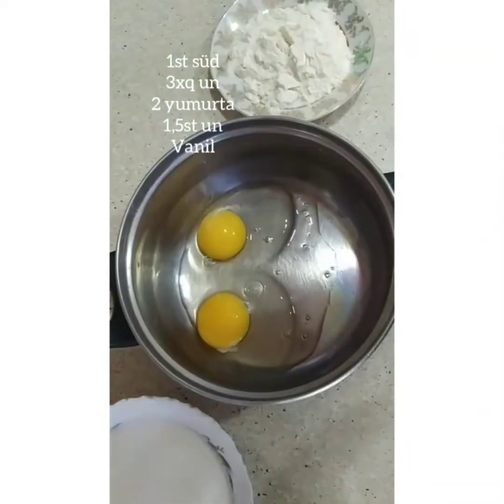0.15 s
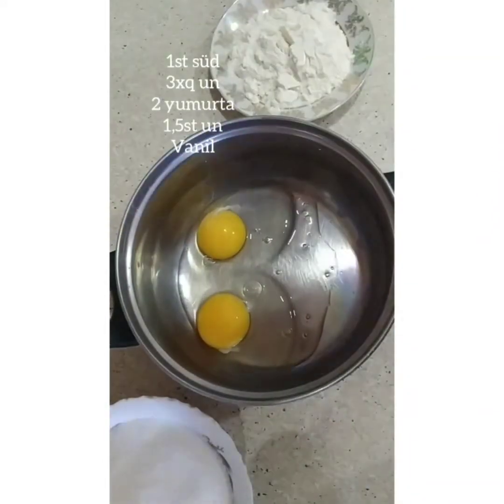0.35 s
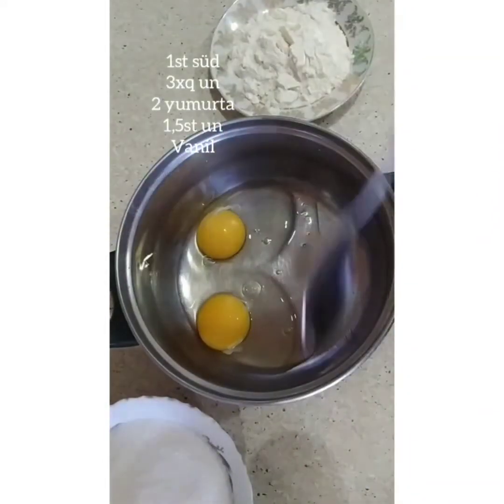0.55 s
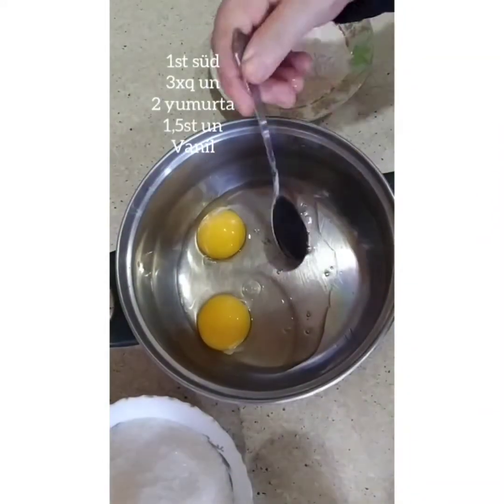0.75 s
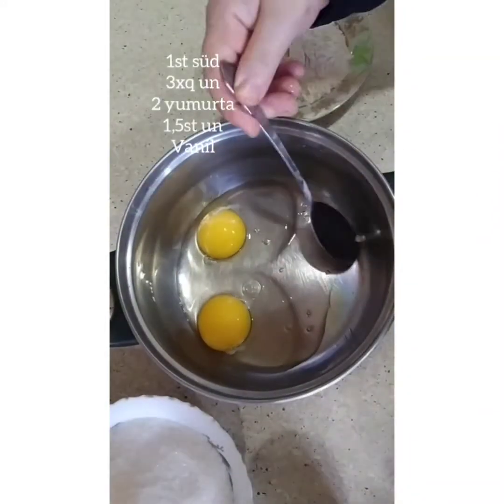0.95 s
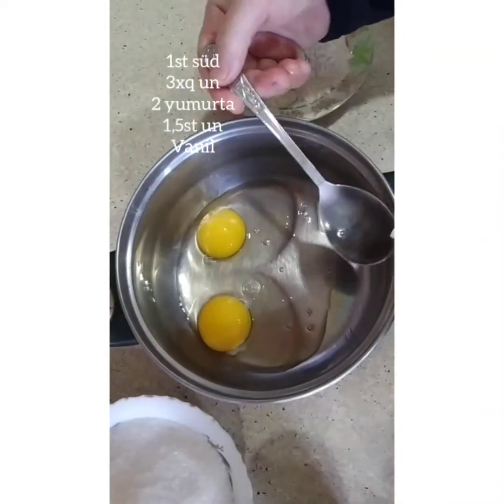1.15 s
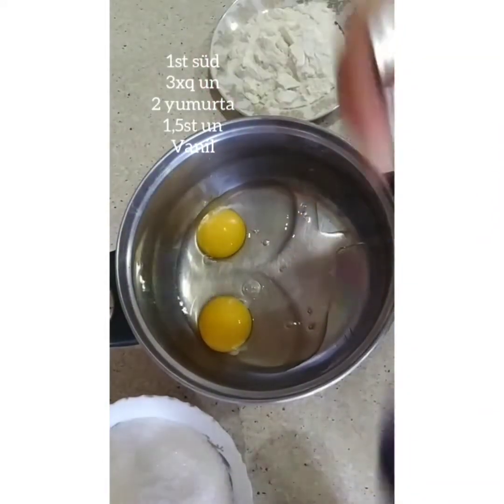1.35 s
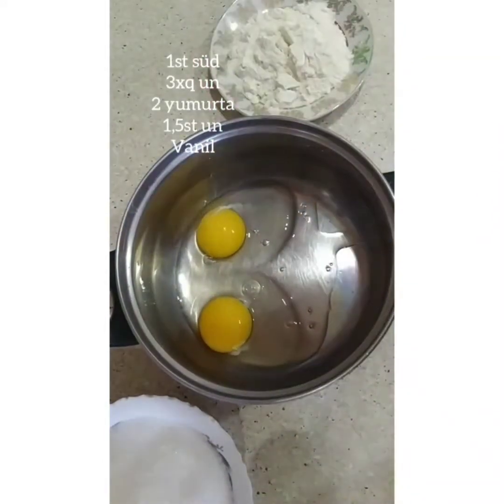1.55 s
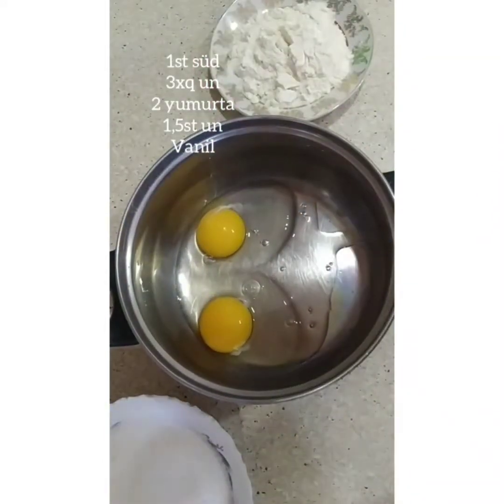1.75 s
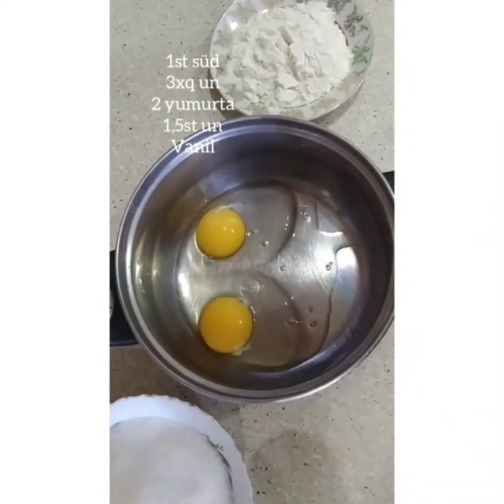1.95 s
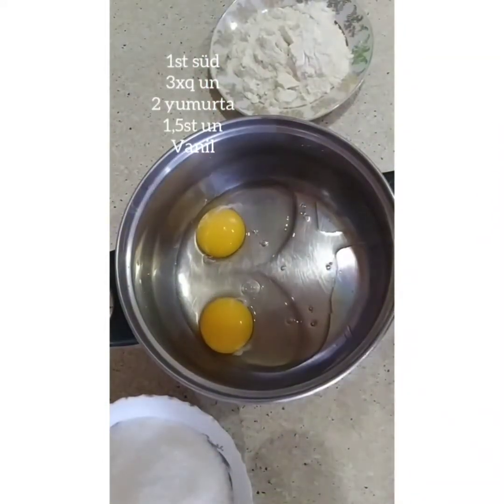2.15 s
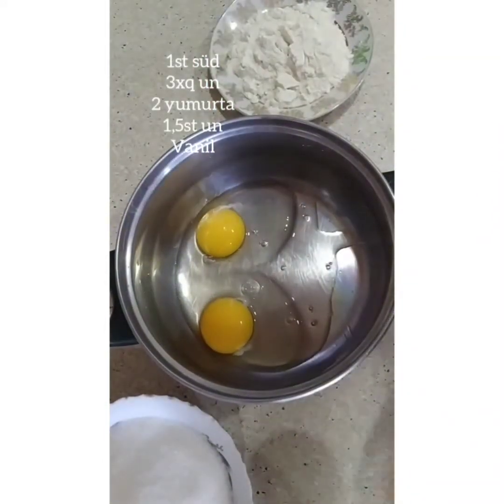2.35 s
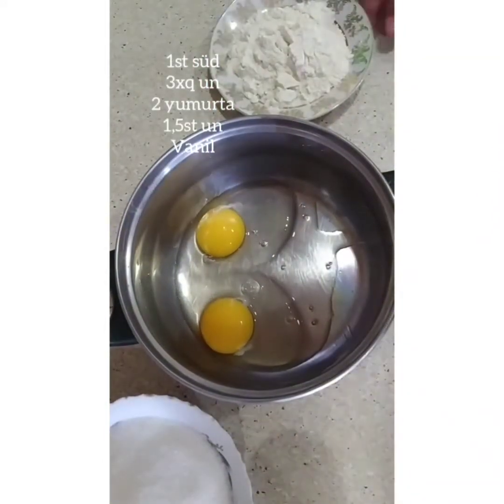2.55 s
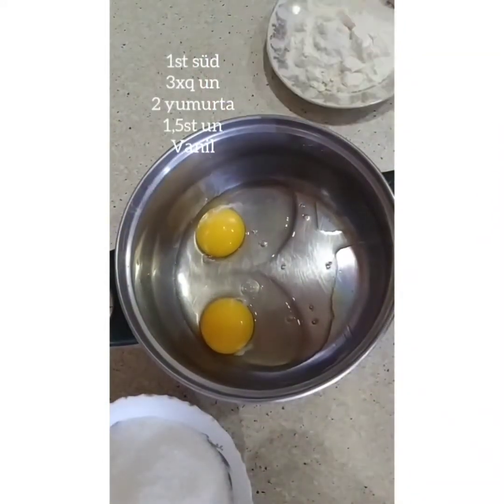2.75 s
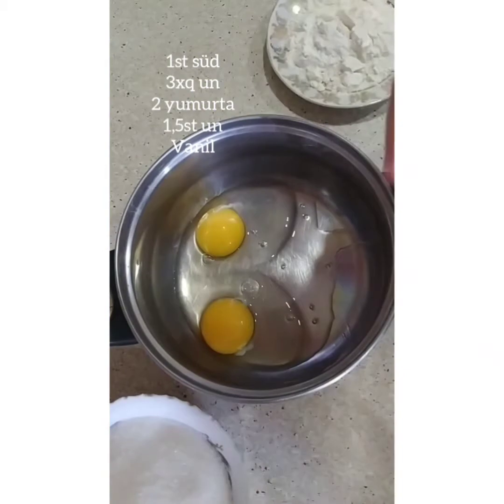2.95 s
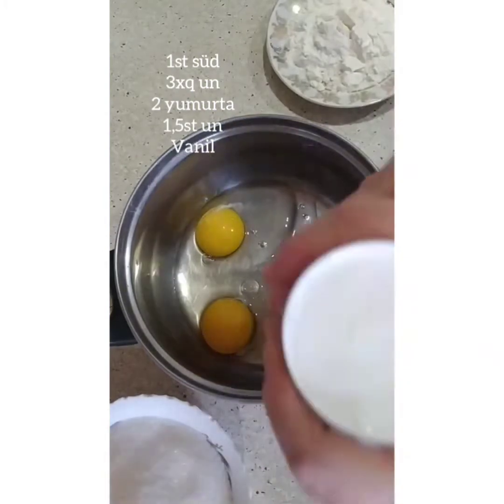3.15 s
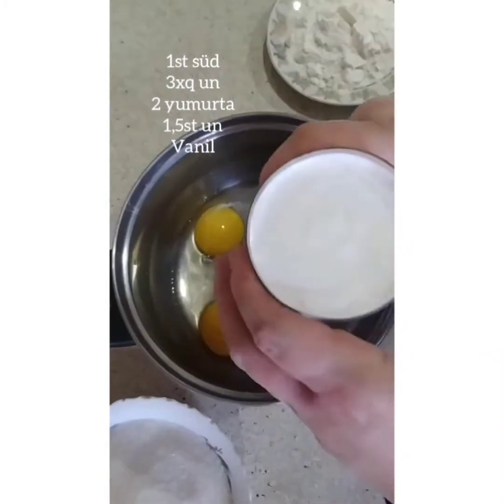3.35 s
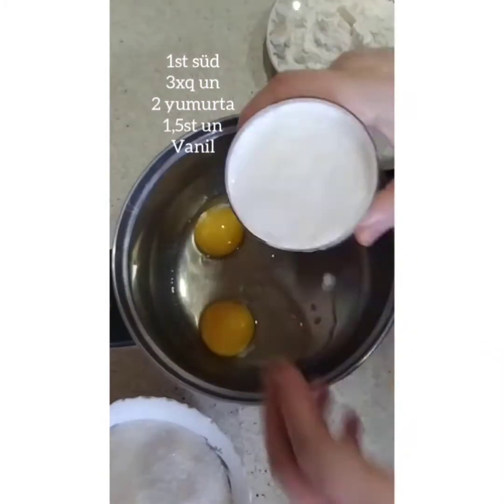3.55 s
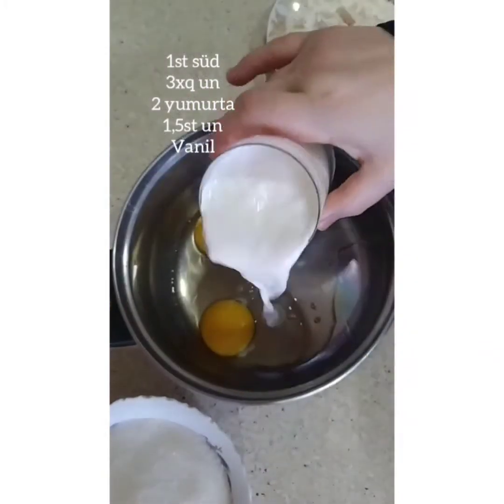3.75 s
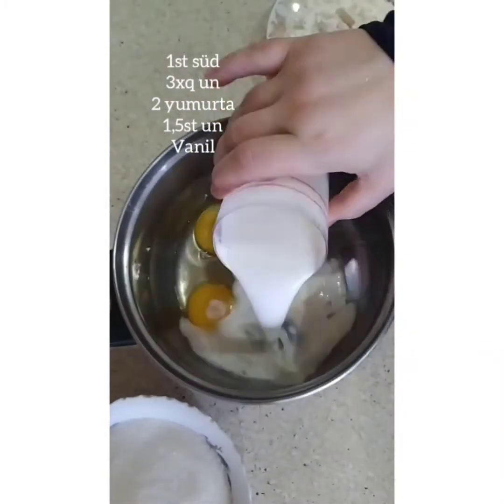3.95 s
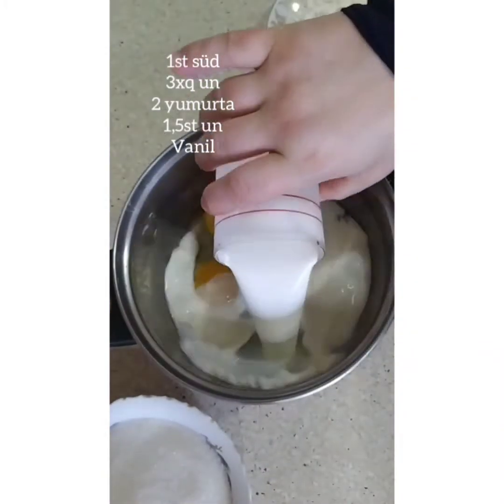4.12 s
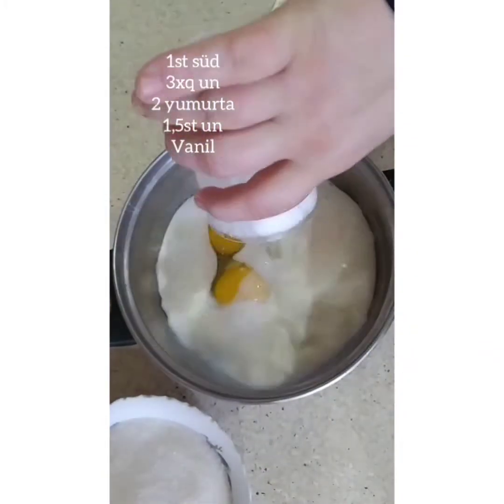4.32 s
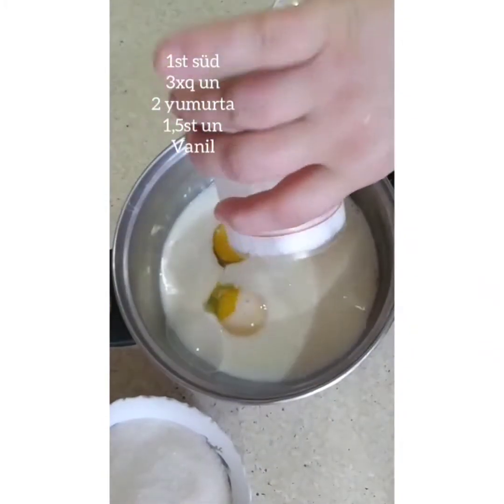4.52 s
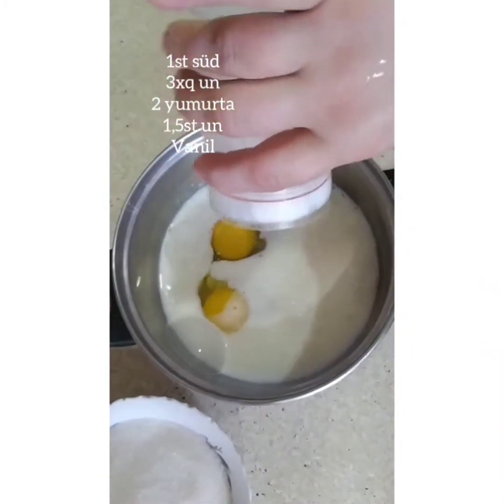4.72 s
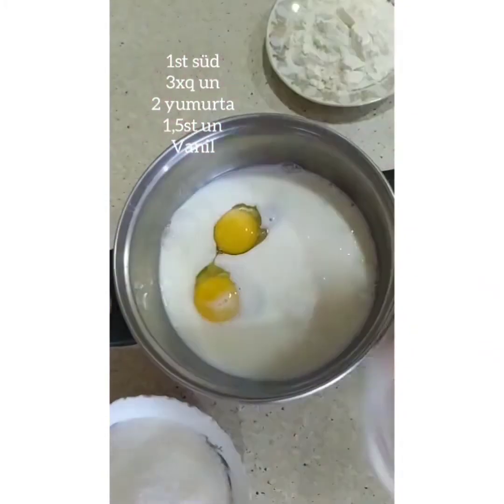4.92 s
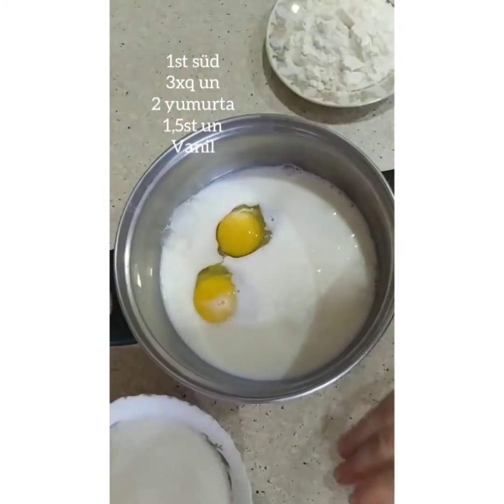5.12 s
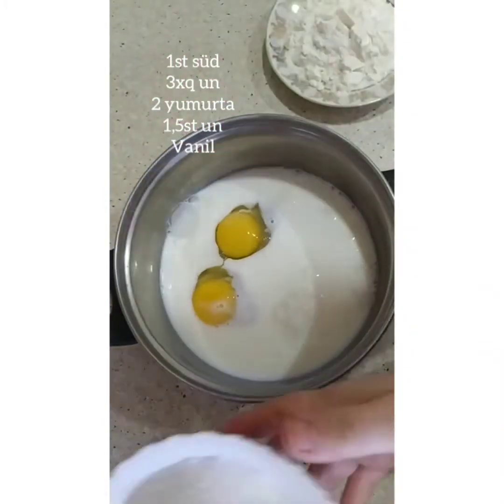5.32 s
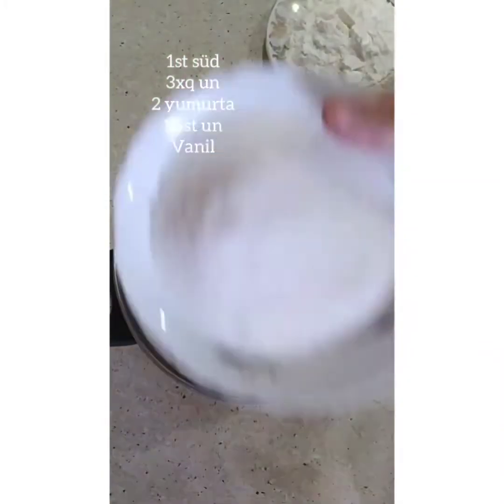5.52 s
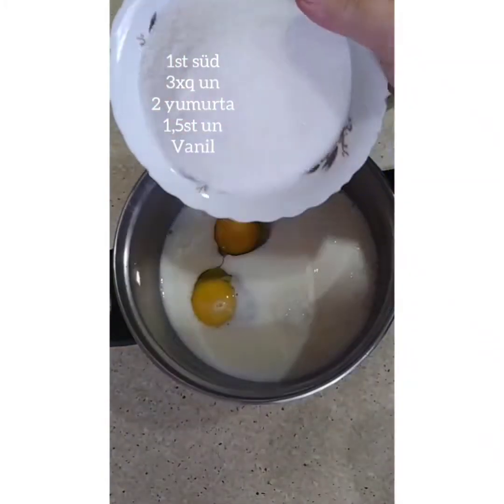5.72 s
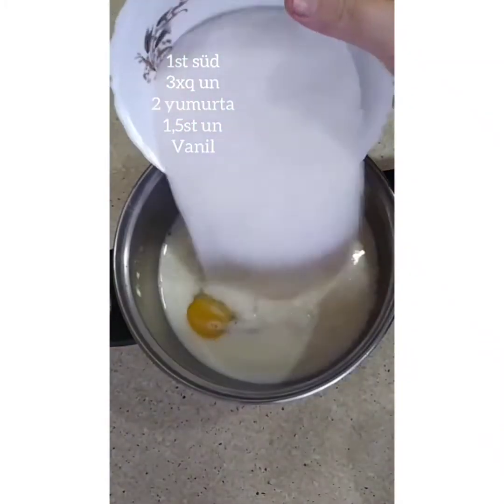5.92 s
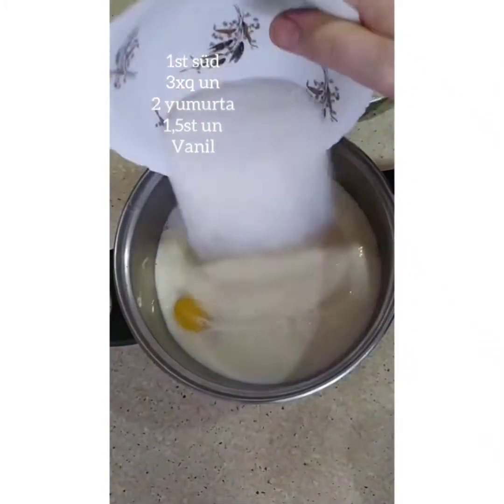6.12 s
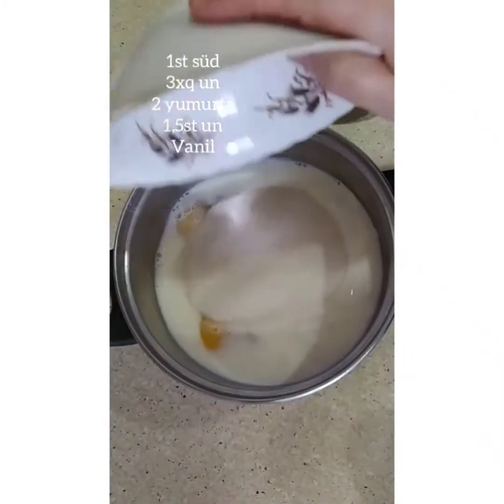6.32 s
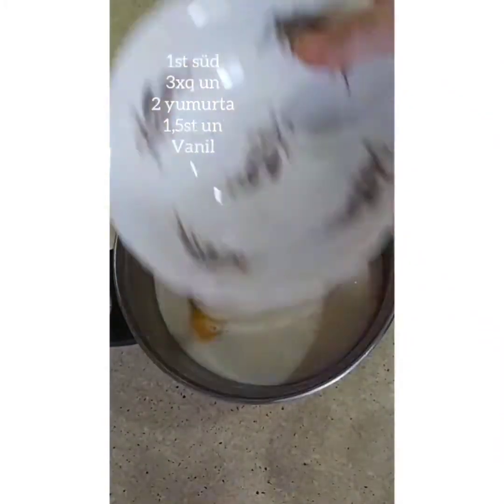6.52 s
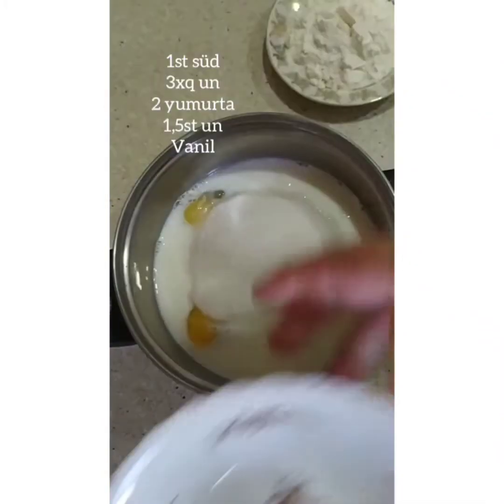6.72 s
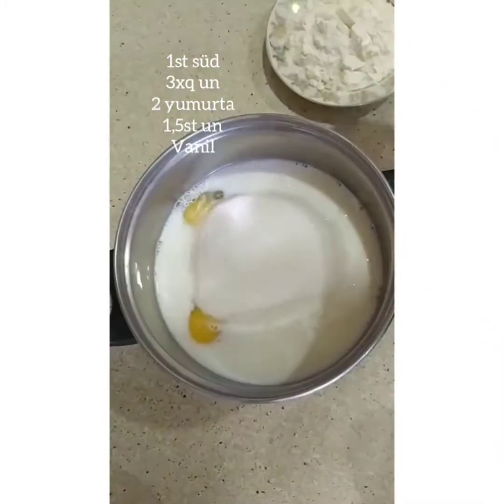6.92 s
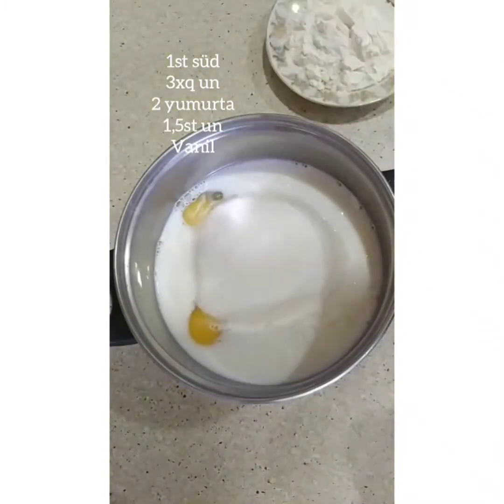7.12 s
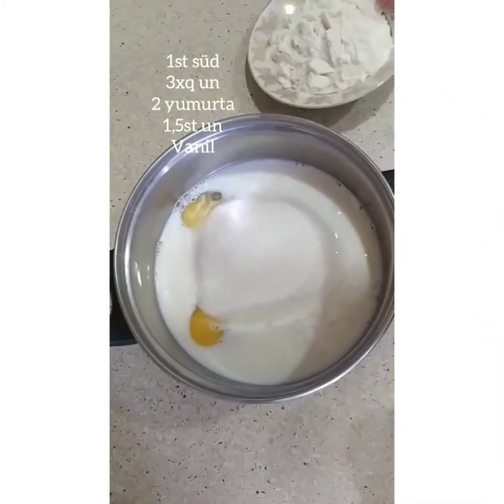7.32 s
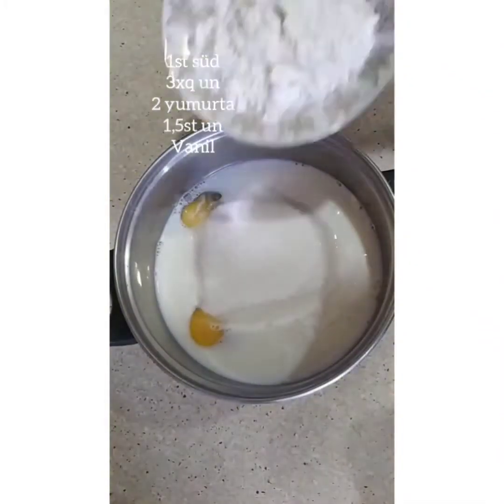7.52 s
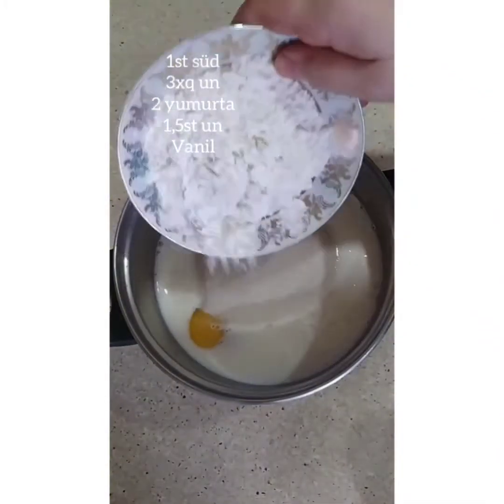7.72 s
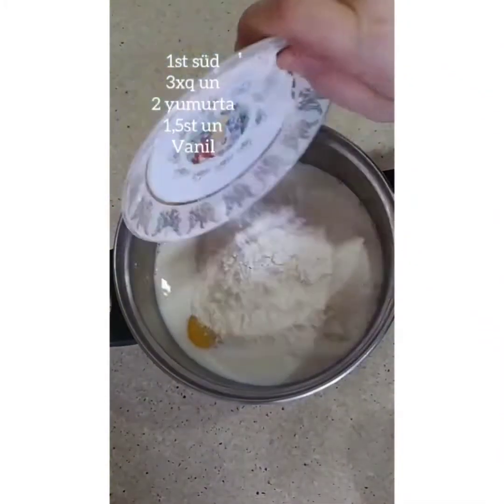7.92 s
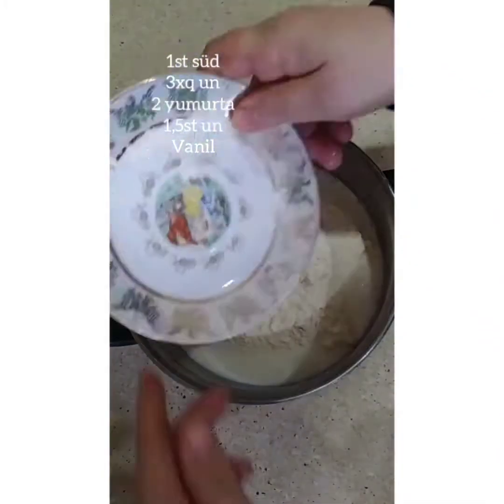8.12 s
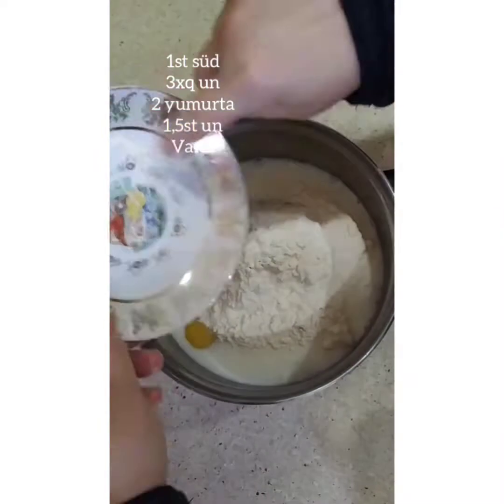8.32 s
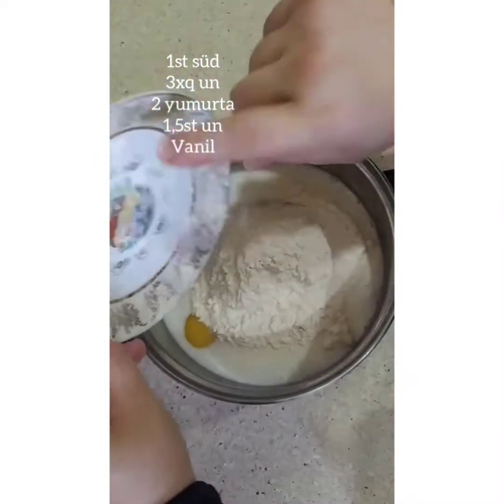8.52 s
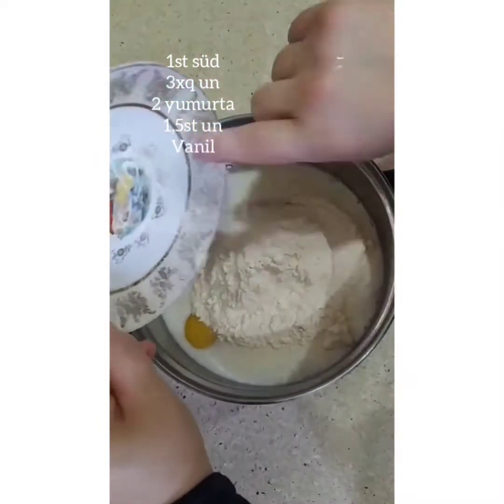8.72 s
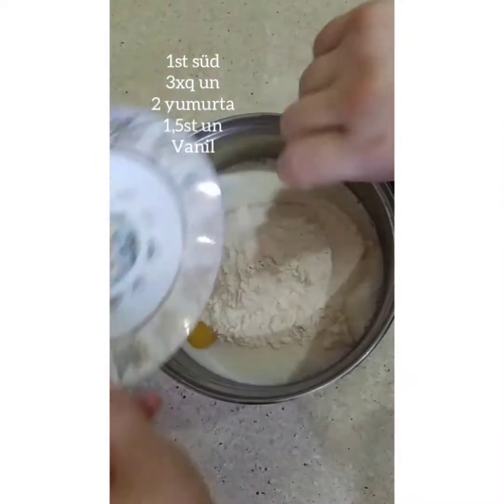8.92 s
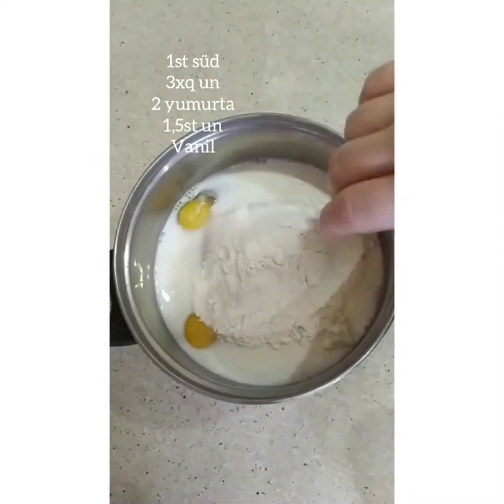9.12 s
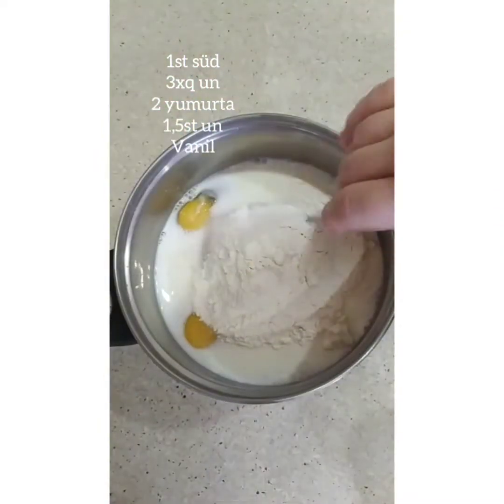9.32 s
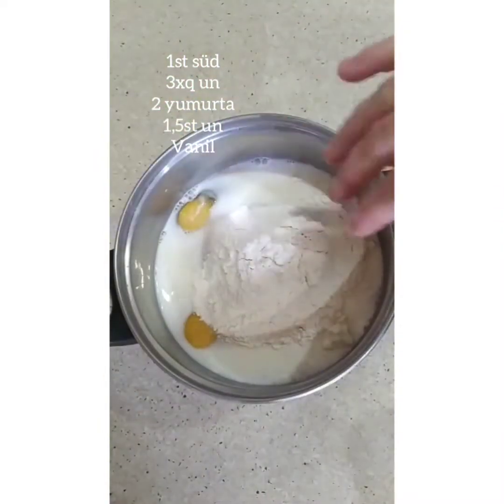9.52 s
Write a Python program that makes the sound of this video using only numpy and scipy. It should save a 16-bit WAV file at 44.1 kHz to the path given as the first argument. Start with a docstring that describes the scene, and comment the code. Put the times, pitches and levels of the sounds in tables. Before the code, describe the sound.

In a small kitchen, a spoon taps and scrapes a metal pot, then milk, sugar and flour are poured between dish knocks over faint ticking.

```python
"""A small kitchen with a stone counter: batter is put together in a steel pot, close under a phone.
A spoon taps and scrapes, things are moved, and the empty glass, bowl and plate are set down: noise bursts plus ringing modes.
Milk, sugar and flour are streams of grainy noise; the milk adds bubbles of climbing pitch.
A quick faint ticking, like a clock, and a steady noise floor run behind it."""
import sys
import numpy as np
from scipy import signal
from scipy.fft import rfft, irfft, next_fast_len
from scipy.io import wavfile
from scipy.ndimage import uniform_filter1d

SR = 44100
rng = np.random.default_rng(int(sys.argv[2]) if len(sys.argv) > 2 else 0)


def output_pcm(signal):
    """Save a mono or channel-first signal as 16-bit PCM at the path in sys.argv[1].

    Samples are clipped to [-1, 1] before scaling.
    """
    pcm = np.clip(np.atleast_2d(signal).T, -1, 1) * 32767
    wavfile.write(sys.argv[1], SR, np.round(pcm).astype(np.int16))


N = 426447  # length [samples]
TIME = np.arange(N) / SR


def undb(db):
    """Decibels to gain."""
    return 10 ** (np.asarray(db) / 20)


def unit(x):
    """Scale to rms 1."""
    return x / np.sqrt(np.mean(x ** 2))


def decay(t, t60):
    """Exponential fade by 60 dB in t60 seconds."""
    return np.exp(-np.log(1000) * t / t60)


def band(x, lo, hi):
    """Causal band-pass."""
    sos = signal.butter(3, [lo, min(hi, .45 * SR)], "band", fs=SR, output="sos")
    return signal.sosfilt(sos, x)


def colour(x, points):
    """Shape a spectrum by (frequency [Hz], level [dB]) points, joined evenly over log frequency."""
    hz, db = np.transpose(points)
    size = next_fast_len(x.shape[-1])
    f = np.maximum(np.fft.rfftfreq(size, 1 / SR), 1)
    gain = undb(np.interp(np.log(f), np.log(hz), db))
    return irfft(rfft(x, size) * gain, size)[..., :x.shape[-1]]


def pair(size, apart_hz):
    """Noise at two microphones: alike in the bass, unrelated above apart_hz."""
    mid, side = rng.standard_normal((2, size))
    side = signal.sosfilt(signal.butter(1, apart_hz, "high", fs=SR, output="sos"), side)
    return np.array([mid + side, mid - side]) / np.sqrt(2)


def grit(size, spread_db, count=24):
    """Gain that jumps from one tiny contact to the next, every count samples."""
    steps = undb(spread_db * rng.standard_normal(size // count + 1))
    return unit(np.repeat(steps, count)[:size])


def grains(strength, points, spread_db):
    """A stream of tiny impacts whose strength follows the flow."""
    return unit(colour(pair(N, 600) * grit(N, spread_db), points)) * strength


def flow(spells, attack_s, sag_db_per_s, release_s):
    """Each spell of rubbing or pouring builds up, weakens steadily and dies away (release is a t60)."""
    power = 0
    for start, length, db in spells:
        age = np.maximum(TIME - start, 0)
        sagging = undb(db - sag_db_per_s * np.minimum(age, length))
        fall = sagging * decay(np.maximum(age - length, 0), release_s)
        power = power + (np.minimum(age / attack_s, 1) * fall) ** 2
    return np.sqrt(power)


def add(out, s, x):
    """Mix x into out from time s."""
    i = int(s * SR)
    lo, hi = max(i, 0), min(i + x.shape[-1], N)
    out[:, lo:hi] += x[..., lo - i:hi - i]


# Colour of the noise floor: (frequency [Hz], level [dB])
FLOOR = [(12, -34), (20, 5.5), (70, -5.5), (120, -5), (410, -18), (590, -15.5), (1220, -25.5),
         (1810, -22.5), (2530, -23.5), (3740, -28.5), (5380, -28.5), (9670, -25.5), (12800, -34),
         (14300, -30.5), (16000, -56)]
FLOOR_DB = -63  # rms


def noise_floor():
    """Steady background noise, shaped in frequency and wider above the bass."""
    return unit(colour(pair(N, 300), FLOOR)) * undb(FLOOR_DB)


TICK_START_S, TICK_PERIOD_S = 0.0005, 0.17577
# Strokes within one tick period: (delay [s], level [dB])
TICK_STROKES = [(0, -52.5), (.027, -65), (.092, -62)]
# Colour of the ticking: (frequency [Hz], level [dB])
TICK_COLOUR = [(300, -11.5), (600, -1), (1200, -6), (2300, 1.5), (3600, -5), (6000, -10), (9500, -2.5),
               (12000, -14.5), (15500, -21.5)]


def ticking(rise_s=0.0049, t60_s=0.11, uneven_db=1.0):
    """Each period has a stroke and two weaker ones, never quite equally strong, soft in onset and tail."""
    power = 0
    for delay, db in TICK_STROKES:
        turn, age = np.divmod(TIME - TICK_START_S - delay, TICK_PERIOD_S)
        strength = undb(db + uneven_db * rng.standard_normal(size=64))[turn.astype(int)]
        stroke = strength * np.minimum(age / rise_s, 1) * decay(age, t60_s)
        power = power + stroke ** 2
    return unit(colour(pair(N, 500), TICK_COLOUR)) * np.sqrt(power)


# Kitchen reverberation by band: (low edge [Hz], high edge [Hz], t60 [s])
ROOM = [(80, 270, 0.22), (399.2, 1500, 0.29), (1520, 5600, 0.28), (5010, 11300, 0.23), (11200, 17000, .2)]


def kitchen(x, first_s=0.0033, build_s=0.011):
    """Dense reflections from near walls and cupboards."""
    t = np.arange(int(.7 * SR)) / SR
    onset = np.clip((t - first_s) / build_s, 0, 1)
    tail = 0
    for lo, hi, t60 in ROOM:
        tail = tail + band(rng.standard_normal((2, len(t))), lo, hi) * decay(t, t60)
    response = unit(tail * onset) / np.sqrt(len(t))
    return signal.fftconvolve(x, response, axes=1)[:, :N]


# Heavy blows jolt the phone: (time [s], centre [Hz], peak level [dB], t60 [s])
JOLTS = [(0.387, 65, -26, 0.23), (0.403, 125, -19, .12), (2.03, 80, -45.5, 0.26), (5.055, 85, -35, 0.24),
         (6.964, 200, -16, .08), (7.055, 80, -33.5, .22), (9.349, 24, -32.5, 0.26)]


def jolts():
    """A deep shudder reaches the phone through the counter."""
    out, t = np.zeros((2, N)), np.arange(SR // 2) / SR
    for s, hz, db, t60 in JOLTS:
        shudder = band(pair(len(t), 150) * decay(t, t60), hz / 2, hz * 2)
        add(out, s, undb(db) * shudder / np.abs(shudder).max())
    return out


# Slides of flour off the plate: (start [s], length [s], level [dB])
FLOUR = [(8.055, .19, -62), (8.25, 0.021, -56), (8.37, 0.16, -61), (8.572, 0.021, -58)]
# Colour of flour and sugar: (frequency [Hz], level [dB])
POWDER_COLOUR = [(880, -10), (1500, -6.5), (2130, -13), (2520, -2), (2860, -9), (4570, -3), (6010, -4),
                 (6690, -1), (9420, 7), (11700, -2), (15500, -10)]


def flour():
    """Flour slips off the plate in soft lumps, each a short run of tiny impacts."""
    slide = flow(FLOUR, attack_s=0.0098, sag_db_per_s=26, release_s=0.082)
    return grains(slide, POWDER_COLOUR, spread_db=3)


# Slides of sugar off the bowl: (start [s], length [s], level [dB])
SUGAR = [(5.735, 0.06, -57), (5.8, 0.44, -49.5)]


def sugar():
    """Sugar runs off the bowl in a thinning hiss of tiny impacts."""
    slide = flow(SUGAR, attack_s=0.045, sag_db_per_s=20.5, release_s=0.24)
    return grains(slide, POWDER_COLOUR, spread_db=3)


def bubble(hz, t60, rise):
    """A bubble rings and climbs in pitch as it nears the surface."""
    t = np.arange(int(t60 * SR)) / SR
    phase = 2 * np.pi * hz * t * (1 + rise * t / t60 / 2) + rng.uniform(0, 3.0, (2, 1))
    return np.sin(phase) * decay(t, t60) * np.minimum(t / 0.00041, 1)


# Gushes of milk: (start [s], length [s], level [dB])
MILK = [(3.781, 0.11, -55), (3.848, 0.14, -46.5), (4.044, 0.1, -49.5), (4.155, 0.19, -45.5)]
# Colour of the splatter: (frequency [Hz], level [dB])
MILK_COLOUR = [(88, -31), (150, -6.5), (278, -3), (378, -9), (1030, -5), (1230, -26), (1600, -14),
               (3210, -5.5), (4540, -11.5), (9090, -3), (15000, -23)]
# Largest bubbles and the high snap of single drops:
# (time [s], starting pitch [Hz], level [dB], share by which the pitch climbs)
BUBBLES = [(3.785, 8250, -34.5, .1), (3.845, 1980, -45, .08), (3.942, 1530, -47, .1),
           (3.989, 1670, -40.5, .25), (4.054, 1048, -48, 0.033), (4.097, 1365, -48, .1),
           (4.16, 2620, -35.5, 0.94), (4.217, 1590, -43, 0.12), (4.293, 2350, -40, 0.23),
           (4.307, 893, -41.5, 0.058), (4.342, 8080, -26.5, 0.4), (4.838, 8500, -36.5, 0.79)]
BUBBLE_CYCLES = 100  # starting-pitch cycles in a large bubble's t60
# Small bubbles: level against the stream, and how far the strongest stand above that [dB]
FIZZ_DB, FIZZ_SPREAD_DB = -4, 11


def milk(count=160):
    """Uneven splatter on steel and egg, a few large bubbles and a swarm of small ones."""
    stream = flow(MILK, attack_s=0.0076, sag_db_per_s=60, release_s=0.13)
    unevenness = uniform_filter1d(grit(N, 2.3, count=500), size=100)
    out = grains(stream, MILK_COLOUR, spread_db=2) * unevenness
    for s, hz, db, rise in BUBBLES:
        add(out, s, undb(db) * bubble(hz, BUBBLE_CYCLES / hz, rise))
    first, last = MILK[0][0], MILK[-1][0] + MILK[-1][1]
    for when, size, strength in rng.random((count, 3)):
        s = first + when * (last - first)
        hz = 1200 * 4 ** size
        level = stream[int(s * SR)] * undb(FIZZ_DB + FIZZ_SPREAD_DB * strength ** 2)
        add(out, s, level * bubble(hz, 55 / hz, .35))
    return out


# Strokes of the spoon over the pot's floor: (start [s], length [s], level [dB])
SCRAPE = [(0.775, 0.12, -42.5), (0.941, 0.11, -34.5), (1.105, .025, -38)]
# Colour of the scrape: (frequency [Hz], level [dB])
SCRAPE_COLOUR = [(180, -59), (300, -35.5), (452, -15), (750, -11), (1110, -5), (1230, -18), (1420, -4.5),
                 (1760, -17.5), (2870, -10.5), (4320, -20), (5200, -12), (6840, -10.5), (8460, 2),
                 (9800, 1), (15000, -26.5)]
WALL_ECHO = .25  # gain of the echo off the pot wall


def scrape(near_s=0.00027, far_s=0.000727):
    """The spoon's edge sticks and slips; its echo off the pot wall shifts as it travels."""
    pressure = flow(SCRAPE, attack_s=.012, sag_db_per_s=6, release_s=0.17)
    slips = grit(N, 2.6, count=150) * grains(pressure, SCRAPE_COLOUR, spread_db=0.5)
    lag = np.interp(TIME, [SCRAPE[0][0], SCRAPE[-1][0]], [near_s, far_s])
    echo = np.array([np.interp(TIME - lag, TIME, side) for side in slips])
    return slips + WALL_ECHO * echo


def ring(modes, t, scatter_db=1.5):
    """Free ringing from t = 0; each mode reaches the two microphones with its own phase."""
    out = 0
    for hz, db, t60 in modes:
        phase = rng.uniform(0, 2 * np.pi) + min(hz / 900, 2) * rng.uniform(-1, 1, (2, 1))
        gain = undb(db + scatter_db * rng.standard_normal((2, 1)))
        tone = np.sin(2 * np.pi * hz * t + phase)
        out = out + gain * tone * decay(np.maximum(t, 0), min(t60, .6))
    return out * np.clip(t / 0.00062, 0, 1) / np.linalg.norm(undb(np.array(modes)[:, 1]))


def body(x, modes, gaps, ring_db, width, ripple_db, count=130):
    """In contact, modes are damped to broad peaks; countless weaker ones ripple between them."""
    f = np.fft.rfftfreq(x.shape[-1], 1 / SR)
    peaks = sum(undb(db) / (1 + ((f - hz) / (25 + width * hz)) ** 2) for hz, db, _ in modes)
    dips = sum(db * np.exp(-((f - hz) / half) ** 2) for hz, half, db in gaps)
    ripple = np.interp(f, np.linspace(0, SR / 2, count), rng.standard_normal(count))
    ripple = ripple * np.minimum(f / 2500, 1)
    gain = np.sqrt(1 + undb(ring_db) ** 2 * peaks) * undb(dips + ripple_db * ripple)
    return irfft(rfft(x) * gain, x.shape[-1])


# Bands of a blow, thump, knock, clack, click: (low edge [Hz], high edge [Hz])
BLOW_BANDS = [(130, 400), (400, 1400), (1500, 5000), (5000, 16000)]
# Share of the hardness that each of these bands takes
HARDNESS_SHARE = np.array([-1, -1, 0, 1]) / 2
# Colour of every contact: (frequency [Hz], level [dB])
CONTACT = [(100, -5.5), (220, -5), (350, -4.5), (600, 7), (1100, 0), (1600, 2.5), (2500, 8), (3700, 0),
           (5200, -3), (7000, -2.5), (9500, 2), (11000, -3), (12500, -13.5), (15500, -18)]


def blows(table, modes, thump_db, clack_db, body_db, room_db, bass_hold, gaps=(), grit_db=2.0):
    """Noise rises exponentially to each blow's peak and fades while the object rings on.

    A harder contact is brighter; thump and clack are the object's own weight in the bass and
    upper middle. Gives (direct, sent to room)."""
    direct, sent = np.zeros((2, 2, N))
    t = np.arange(-4096, 20480) / SR
    holds = np.geomspace(bass_hold, 1, len(BLOW_BANDS))  # low vibrations outlast high ones
    for s, db, hardness, rise, fade, ring_db, pan in table:
        levels = undb(db + hardness * HARDNESS_SHARE + np.array([thump_db, 0, clack_db, 0]))
        noise = colour(pair(len(t), 590) * grit(len(t), grit_db), CONTACT)
        noise = body(noise, modes, gaps, body_db, width=.01, ripple_db=6.0)
        sound = 0
        for (lo, hi), gain, hold in zip(BLOW_BANDS, levels, holds):
            envelope = decay(np.maximum(-t / max(rise, .001), t / max(fade * hold, .005)), 1)
            part = unit(band(noise * envelope, lo, hi)) * np.sqrt(np.mean(envelope ** 2))
            sound = sound + gain * part
        sound = sound + undb(ring_db) * np.linalg.norm(levels) * ring(modes, t)
        add(direct, s + t[0], sound * undb(np.array([[pan], [-pan]]) / 2))
        add(sent, s + t[0], sound * undb(room_db))
    return np.array([direct, sent])


def damped(table, rise_share, ring_db, pan_db):
    """Things held in the hand hardly ring; rise time is a fixed share of fade time."""
    return [(s, db, hardness, rise_share * fade, fade, ring_db, pan_db)
            for s, db, hardness, fade in table]


# Things shoved a little way over the counter:
# (time [s], level [dB], hardness = treble over bass [dB], fade t60 [s])
SHOVES = [(0.089, -38, 8.5, 0.17), (0.298, -35.5, 2.5, 0.27), (0.322, -35, 7.5, 0.27),
          (0.483, -33, 6, 0.066), (1.507, -43.5, -3, 0.081), (1.564, -37, 13, 0.074), (1.596, -27, 8, .09),
          (1.69, -35.5, 0.5, .12), (1.924, -56.5, 22, 0.14), (2.45, -54.5, 10.5, 0.29),
          (2.682, -53, -3.5, 0.42), (6.635, -60, 15, 0.16), (6.776, -31.5, 3, .12), (9.585, -39, 12, .18)]
# Modes of the pot: (frequency [Hz], level [dB], t60 [s])
POT_MODES = [(563, -4.5, 0.25), (960, -6.5, 0.11), (1040, -1, .3), (1750, -6.5, 0.48), (2460, -5.5, 0.17),
             (2470, -4, 0.41), (4660, -10, .25), (6760, -5, .2), (9367, -7.5, .13)]


def shoves():
    """Short rubs around the pot, coloured by its modes."""
    contacts = damped(SHOVES, rise_share=0.43, ring_db=-27.5, pan_db=0.1)
    return blows(contacts, POT_MODES, thump_db=-14.5, clack_db=3.5, body_db=-5.5,
                 room_db=-12, bass_hold=1.2)


# Short dead taps of utensils and dishes: (time [s], level [dB], hardness [dB], fade t60 [s])
TAPS = [(0.301, -28.5, -1, 0.023), (0.443, -25.5, 4, 0.031), (0.488, -28, 12.5, .036),
        (1.486, -26, 14.5, 0.02), (1.546, -39, 7, 0.053), (1.586, -24.5, 8.5, 0.063),
        (1.682, -37, 9, 0.075), (1.809, -41, 7.5, 0.081), (2.032, -42.5, 11, 0.1), (3.872, -42.5, 17, .05),
        (9.518, -31, 24, 0.035)]


def taps():
    """Utensils and dishes tap around the pot, coloured by its modes and barely ringing."""
    contacts = damped(TAPS, rise_share=0.63, ring_db=-28, pan_db=2.5)
    return blows(contacts, POT_MODES, thump_db=-15.5, clack_db=2.0, body_db=-6.5,
                 room_db=-10.5, bass_hold=1.8)


# Pats on the plate: (time [s], level [dB], hardness [dB], fade t60 [s])
PATS = [(8.651, -62.5, -9, 0.16), (8.734, -69, -18, 0.085), (8.772, -48.5, -6.5, 0.037),
        (8.845, -48.5, 5, 0.078)]
# Modes of the plate: (frequency [Hz], level [dB], t60 [s])
PLATE_MODES = [(232.5, -7, 0.31), (338, 4.5, 0.078), (470, -37, .2), (624, -16, 0.59), (665, -7, 0.19),
               (1016, -3, 0.1), (1383, -11, 0.15), (2020, -16, 0.54), (1990, -26, 0.3), (2600, -12.5, 0.49),
               (2640, -12, 0.18), (3150, -5, 0.11), (3600, -3.5, 0.082), (4070, -4, 0.11),
               (4600, 7.5, 0.064), (5040, 3.5, 0.062), (6260, -4, 0.093), (6650, -7, 0.13),
               (7000, 7, 0.078), (7070, -9, 0.07), (7526, -7, 0.12), (8226, -3.5, 0.071), (8300, -12, 0.16),
               (8260, -22, 0.15), (9650, -10, 0.13), (9800, -11, 0.091), (10460, -15, 0.11),
               (11410, -20, .13), (12600, -8, 0.097)]


def pats():
    """Fingers pat the last flour off the plate, whose modes they damp."""
    contacts = damped(PATS, rise_share=0.6, ring_db=-26, pan_db=-2.5)
    return blows(contacts, PLATE_MODES, thump_db=4, clack_db=-7.5, body_db=3,
                 room_db=-11, bass_hold=1.1)


# Blows of the plate: (time [s], level [dB], hardness = treble over bass [dB], rise t60 [s],
# fade t60 [s], ring [dB], left minus right [dB])
PLATE = [(9.112, -52, 3, 0.045, 0.25, -1, -18), (9.135, -25.5, 0, 0.025, 0.097, 2, 3),
         (9.255, -38.5, 5, 0.038, 0.12, -20, -1.5), (9.322, -26, 11, 0.026, 0.095, -2, -1),
         (9.334, -15.5, 1, 0.033, 0.075, -1.5, 2), (9.356, -23, 9, 0.036, 0.17, -22, -1)]
# Dips, and one rise, between the plate's groups of modes: (frequency [Hz], half width [Hz], level [dB])
PLATE_GAPS = [(1520, 140, -6), (3880, 140, -1), (4220, 110, -10), (5570, 110, -1), (7700, 150, -6),
              (10850, 230, -10), (13600, 200, 14)]


def plate():
    """The empty plate is set down and rings in many modes, with antiresonances between them."""
    return blows(PLATE, PLATE_MODES, thump_db=-8.5, clack_db=-1.5, body_db=3.5,
                 room_db=-11.5, bass_hold=2.12, gaps=PLATE_GAPS)


# Blows of the bowl: (time [s], level [dB], hardness [dB], rise t60 [s], fade t60 [s],
# ring [dB], left minus right [dB])
BOWL = [(6.964, -20, -20, 0.0076, 0.051, -17.5, 2.3), (7.056, -22.5, -21, 0.036, 0.1, -7.5, 3)]
# Modes of the bowl: (frequency [Hz], level [dB], t60 [s])
BOWL_MODES = [(136, -22, .2), (227.5, -2.5, 0.11), (290, -1.5, .07), (519, -10.5, 0.43), (600, -9.5, .18),
              (887, 2.5, 0.21), (960, -0.5, 0.062), (1179, 2.5, 0.37), (1294, -1.5, 0.12), (2590, -10, .15),
              (7630, -14.5, 0.17), (10900, 2, 0.064)]


def bowl():
    """The empty bowl is set down and rings in its modes."""
    return blows(BOWL, BOWL_MODES, thump_db=-9.0, clack_db=-4.5, body_db=7,
                 room_db=-12.5, bass_hold=1.76)


# Blows of the glass: (time [s], level [dB], hardness [dB], rise t60 [s], fade t60 [s],
# ring [dB], left minus right [dB])
GLASS = [(5.012, -31.5, -18.5, 0.013, .061, -21, 2), (5.059, -22.5, -17.5, 0.013, 0.05, -17, 1.2)]
# Modes of the glass: (frequency [Hz], level [dB], t60 [s])
GLASS_MODES = [(190, -4.5, .08), (545, -5, 0.25), (872, 3, 0.2), (898, 11.5, 0.059), (700, -14.5, 0.13),
               (1072, -8.5, .12), (1456, -3.5, 0.13), (1710, 4.5, 0.21), (2070, -12, 0.16),
               (2610, -7.5, .15), (4860, -44.5, 0.14)]


def glass():
    """The empty glass is set down and rings in its modes."""
    return blows(GLASS, GLASS_MODES, thump_db=-14, clack_db=2, body_db=10.5,
                 room_db=-12.5, bass_hold=1.53)


# Blows on the counter: (time [s], level [dB], hardness [dB], rise t60 [s], fade t60 [s],
# ring [dB], left minus right [dB])
COUNTER = [(0.394, -25.5, -24.5, 0.058, 0.11, -1.5, 0), (0.417, -31, -16.5, .038, 0.22, 1, -2.5),
           (1.849, -35, -4, 0.06, 0.16, -11, 0), (2.725, -42.5, -16.5, 0.037, .22, -26, -1),
           (6.791, -35, -11.5, .035, 0.21, -12.5, 0)]
# Modes of the counter: (frequency [Hz], level [dB], t60 [s])
COUNTER_MODES = [(149, -4, 0.067), (173, -3, 0.2), (232, 1.5, 0.22), (526.7, -15.5, 0.54), (584, -1, 0.3),
                 (646, -1, 0.26), (870, -8.5, 0.17), (1120, -8.5, 0.16), (1800, -10, .22)]


def counter():
    """The stone counter is struck and rings in its low modes."""
    return blows(COUNTER, COUNTER_MODES, thump_db=-6.5, clack_db=-2.5, body_db=0.5,
                 room_db=-15, bass_hold=1.05)


# Blows of the spoon: (time [s], level [dB], hardness [dB], rise t60 [s], fade t60 [s],
# ring [dB], left minus right [dB])
SPOON = [(0.758, -20, 14.36, 0.014, 0.042, -24, -1.5), (1.13, -20.5, 9.4, 0.041, 0.055, -10.5, 1)]
# Modes of the spoon: (frequency [Hz], level [dB], t60 [s])
SPOON_MODES = [(2800, 8, 0.14), (3461, 5.5, 0.31), (4450, -2.5, 0.21), (5771, -26, 0.24),
               (6310, -5.5, 0.12), (7400, -2, 0.134), (7850, -8.5, 0.22), (9350, 12, 0.056),
               (10770, -30.5, 0.16), (10770, -20, 0.11)]


def spoon():
    """The spoon taps the pot: bright, gritty contacts with high modes."""
    return blows(SPOON, SPOON_MODES, thump_db=-12.5, clack_db=-4.5, body_db=8.0,
                 room_db=-18.5, bass_hold=3.0, grit_db=4.0)


def scene():
    """Quiet background, the room, work inside the pot and the close blows."""
    background = noise_floor() + ticking()
    in_pot = flour() + sugar() + milk() + scrape()
    handling = shoves() + taps() + pats()
    dishes = plate() + bowl() + glass() + counter() + spoon()
    direct, sent = handling + dishes
    reverberation = kitchen(sent + undb(-9.5) * in_pot)
    return background + reverberation + jolts() + in_pot + direct


TOP_HZ = 16000


def record(dry):
    """Round the very loudest peaks to avoid clipping, and cut everything above 16 kHz."""
    rounded = dry / (1 + (dry / .8) ** 8) ** (1 / 8)
    low_pass = signal.ellip(10, .2, 70, TOP_HZ, fs=SR, output="sos")
    return signal.sosfilt(low_pass, rounded)


dry = scene()
out = record(dry)
output_pcm(out)
```